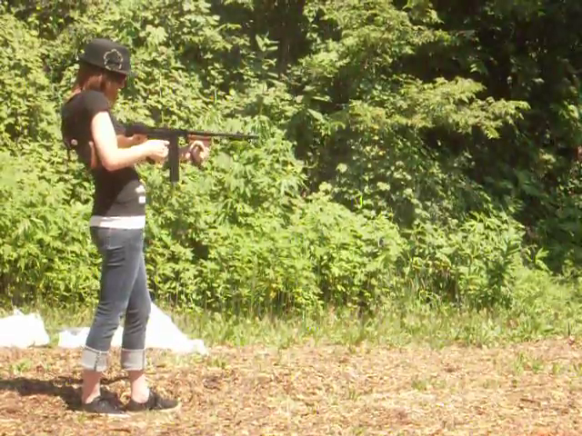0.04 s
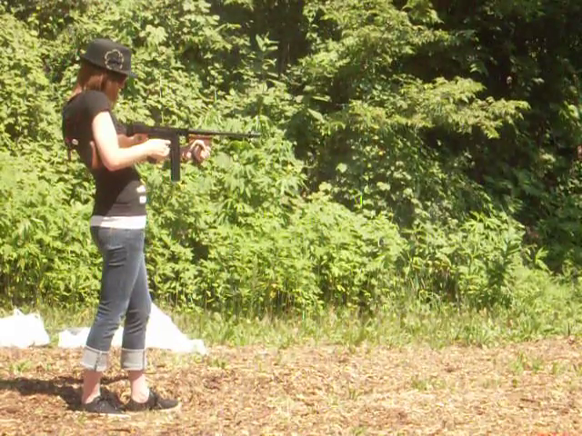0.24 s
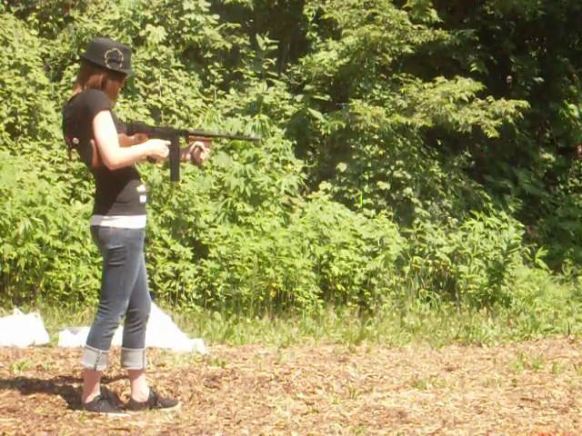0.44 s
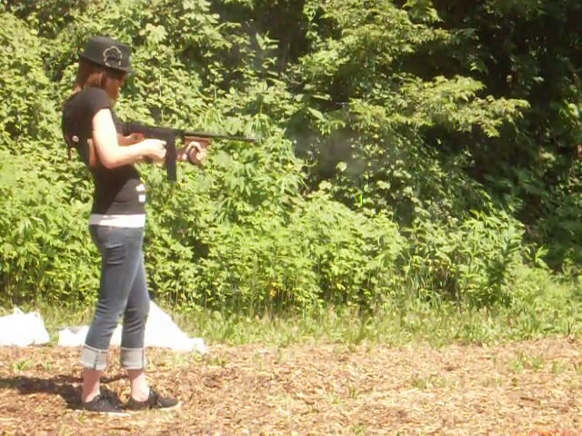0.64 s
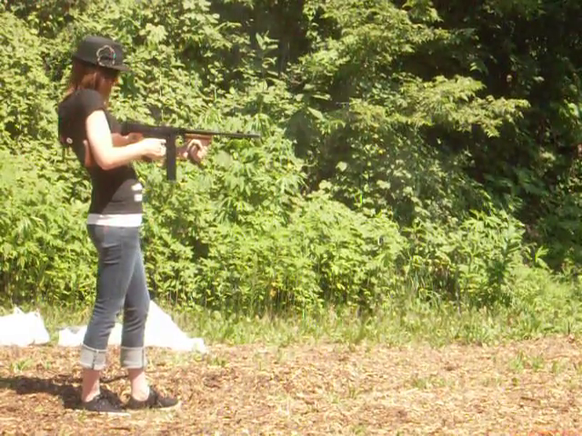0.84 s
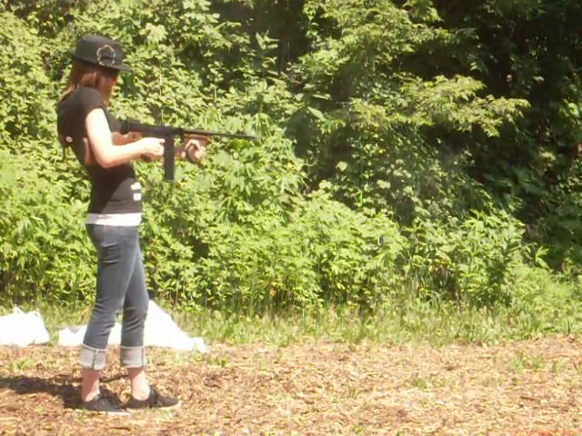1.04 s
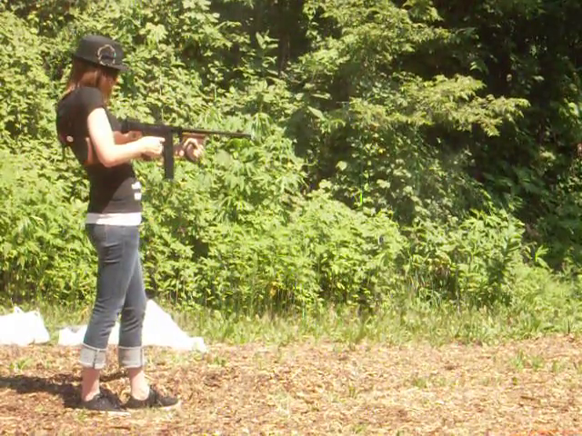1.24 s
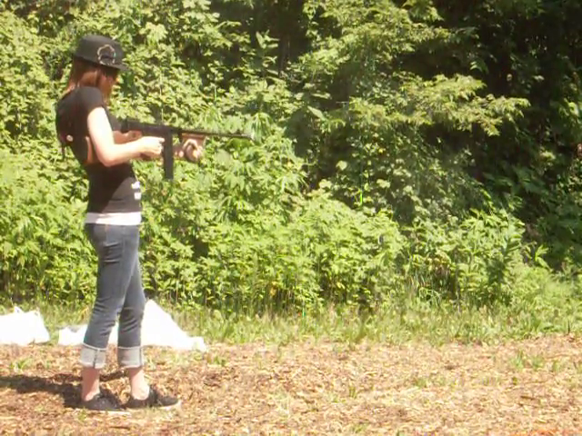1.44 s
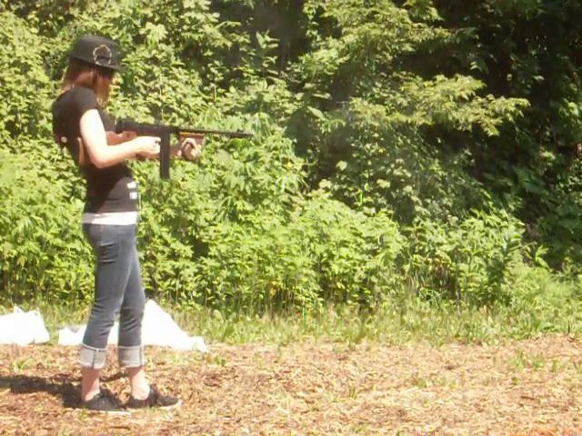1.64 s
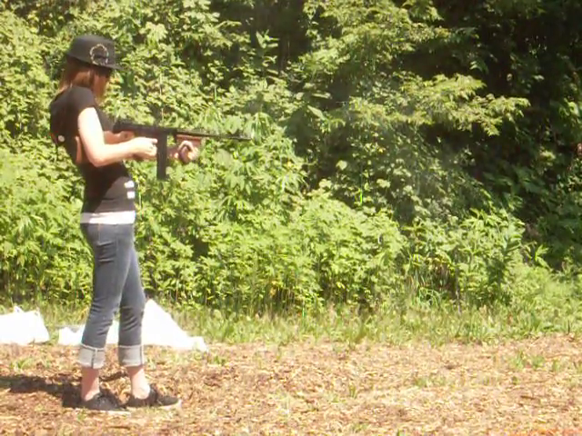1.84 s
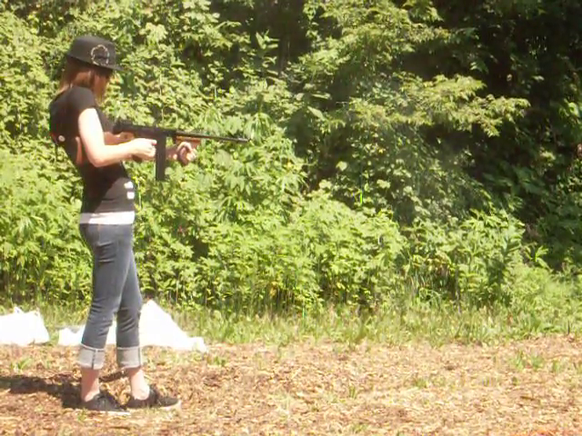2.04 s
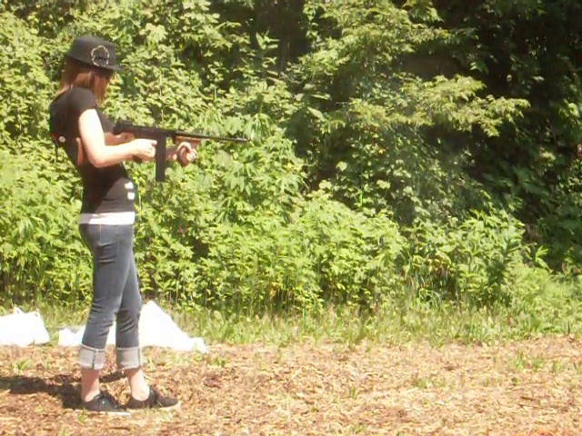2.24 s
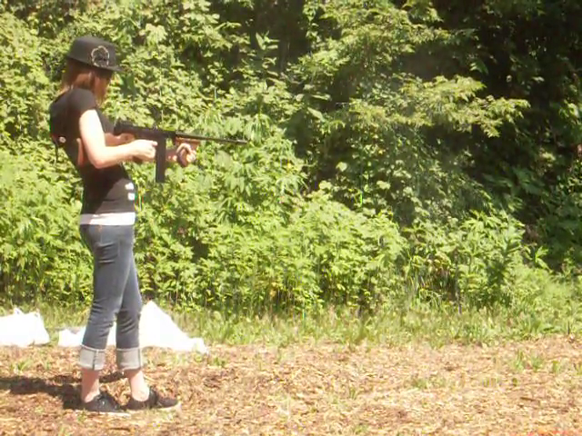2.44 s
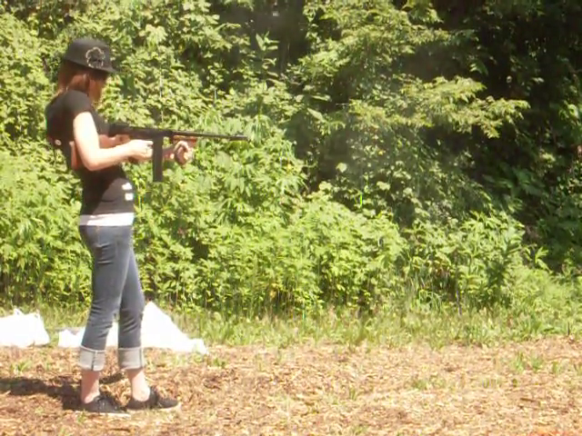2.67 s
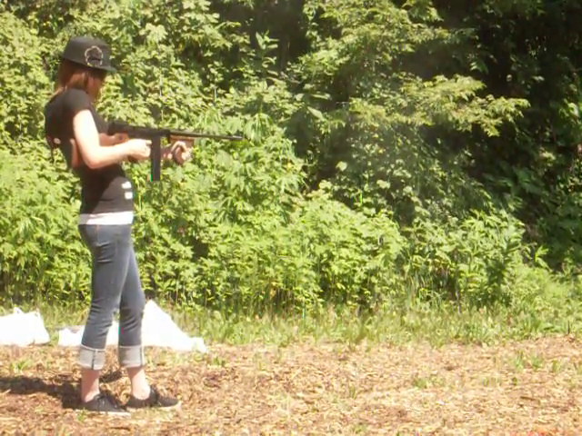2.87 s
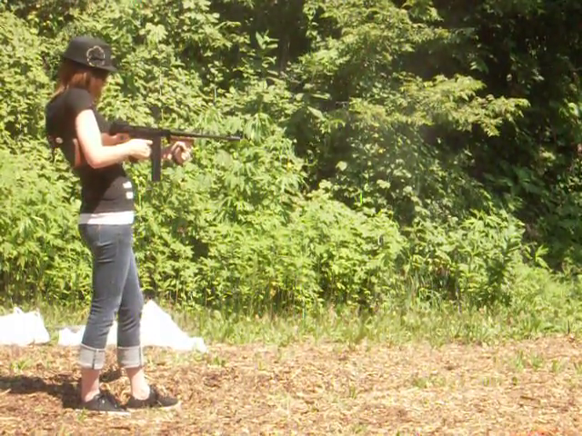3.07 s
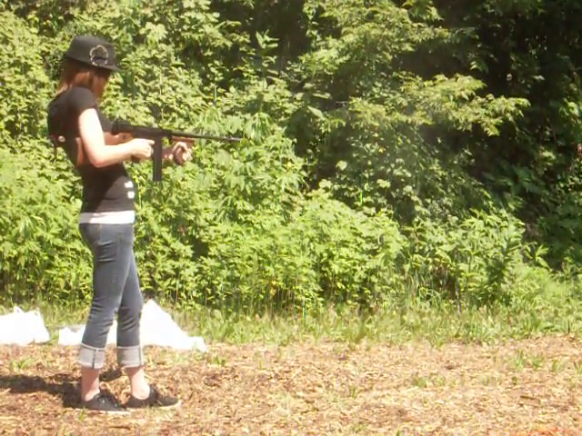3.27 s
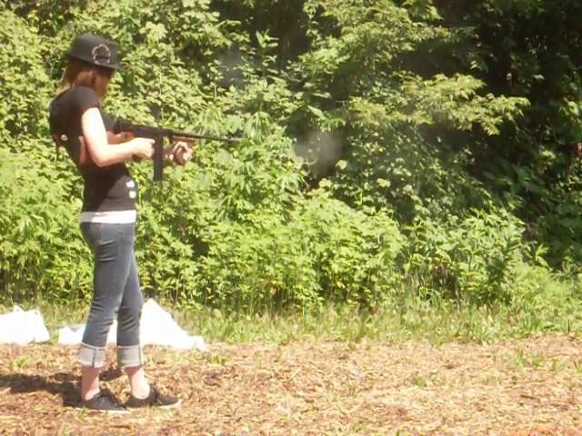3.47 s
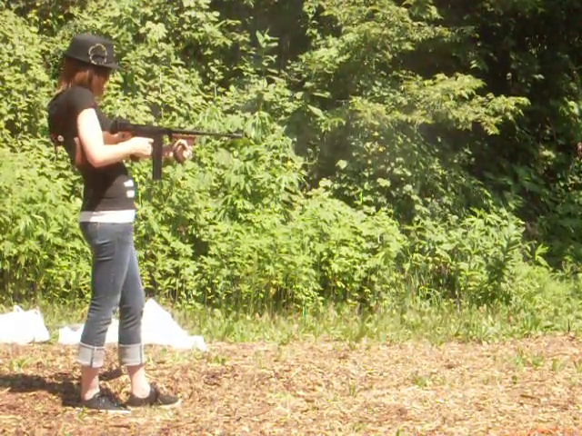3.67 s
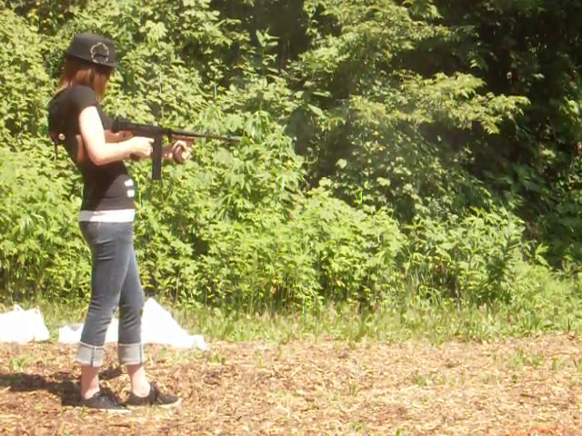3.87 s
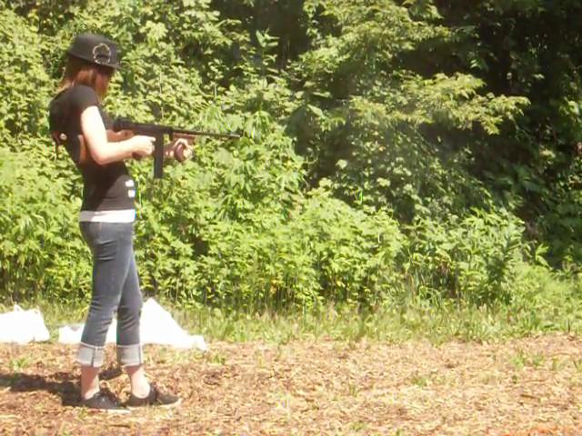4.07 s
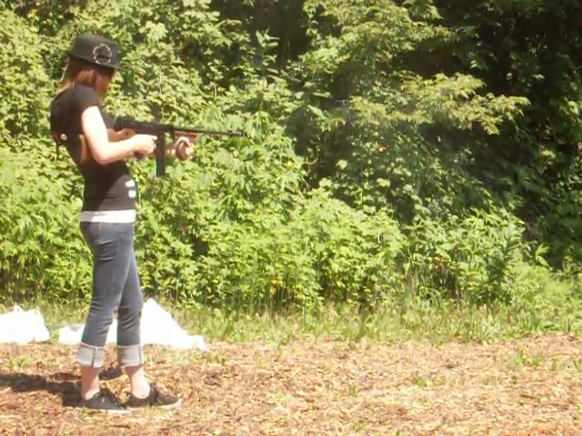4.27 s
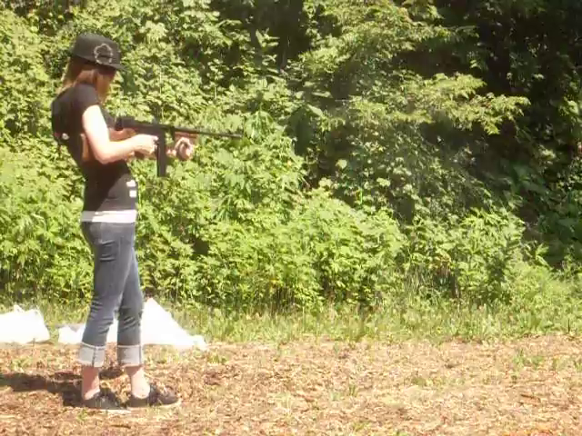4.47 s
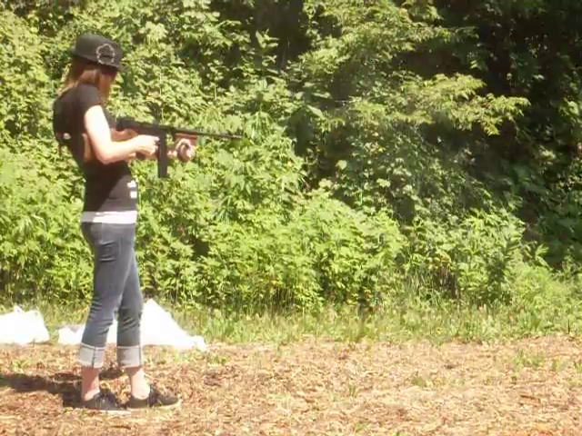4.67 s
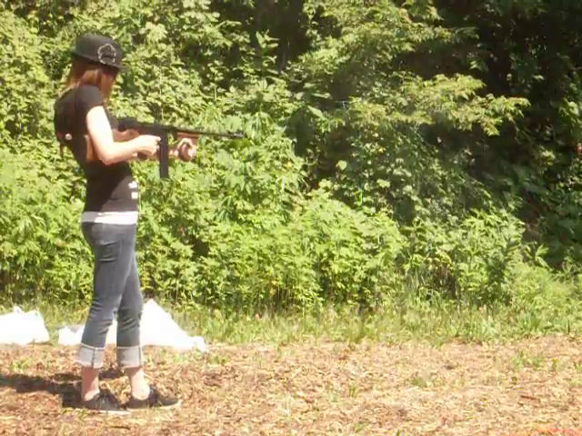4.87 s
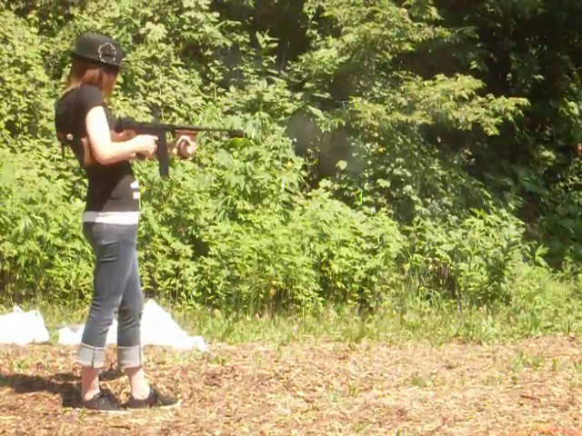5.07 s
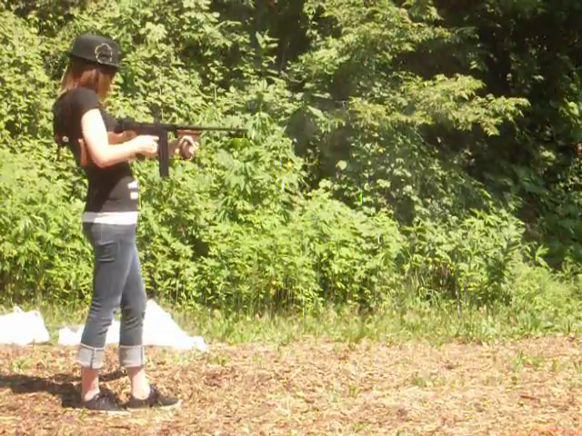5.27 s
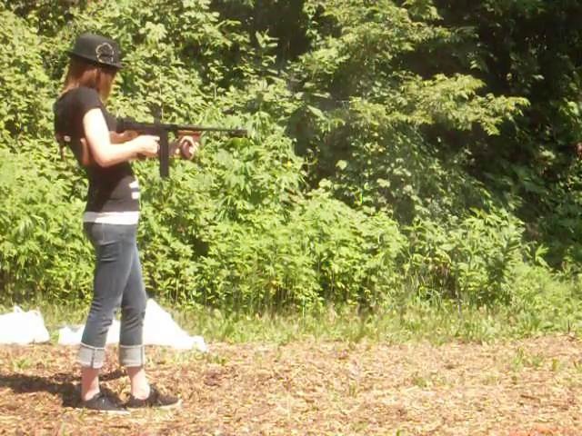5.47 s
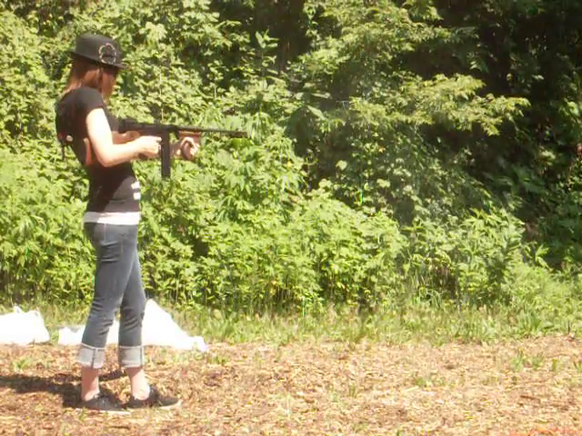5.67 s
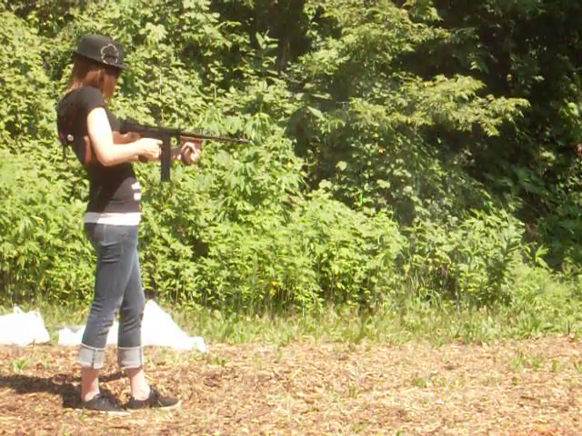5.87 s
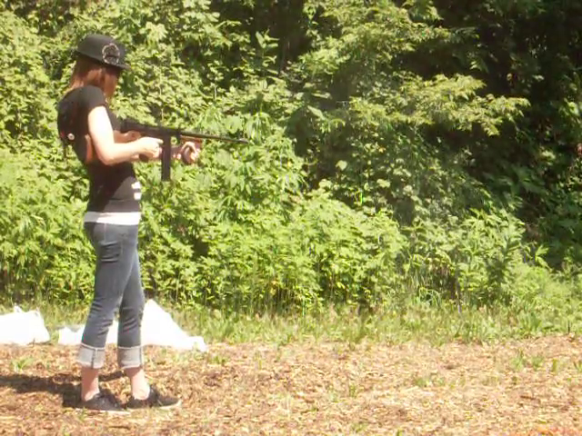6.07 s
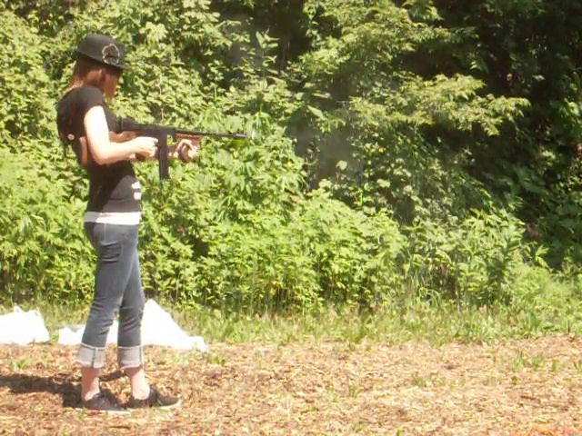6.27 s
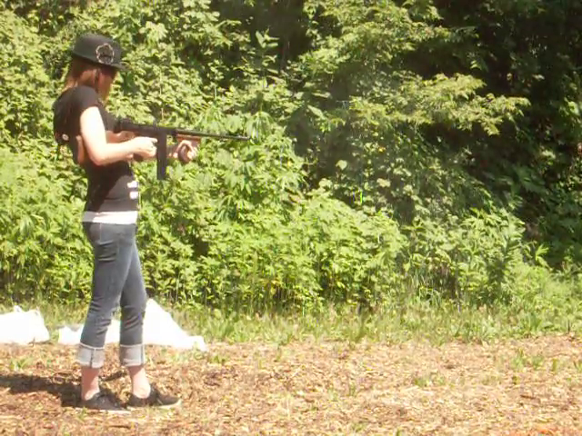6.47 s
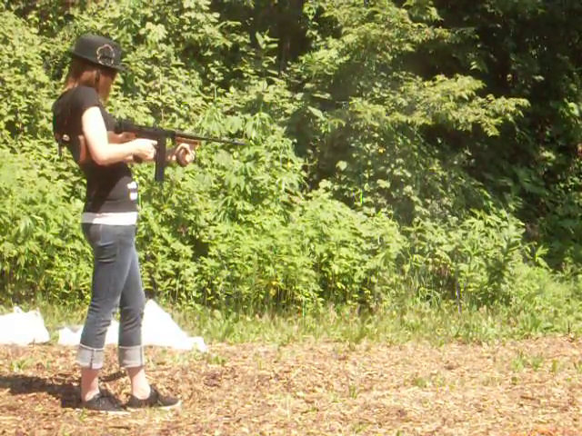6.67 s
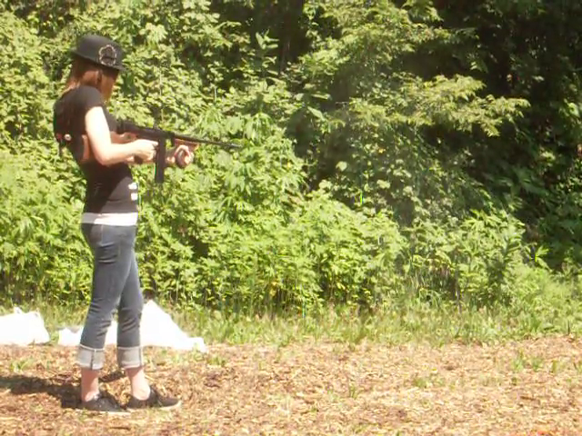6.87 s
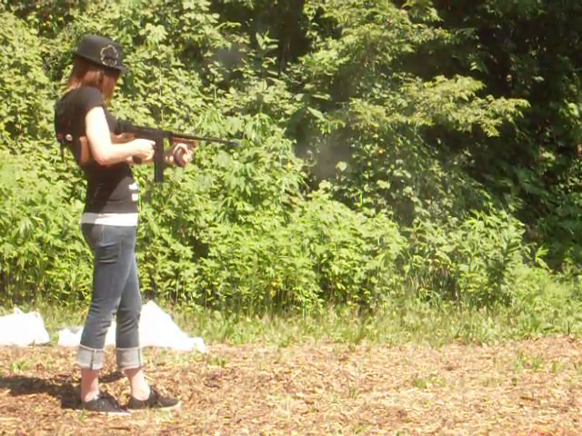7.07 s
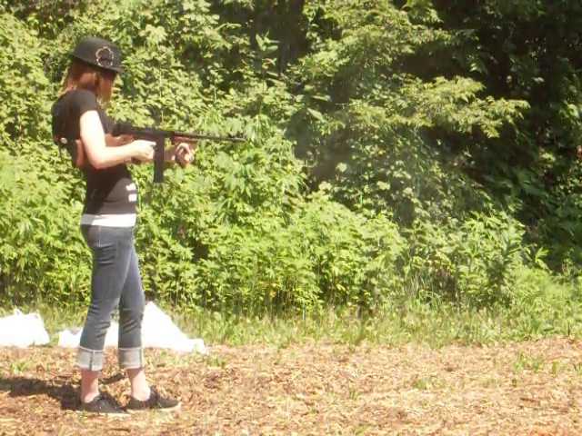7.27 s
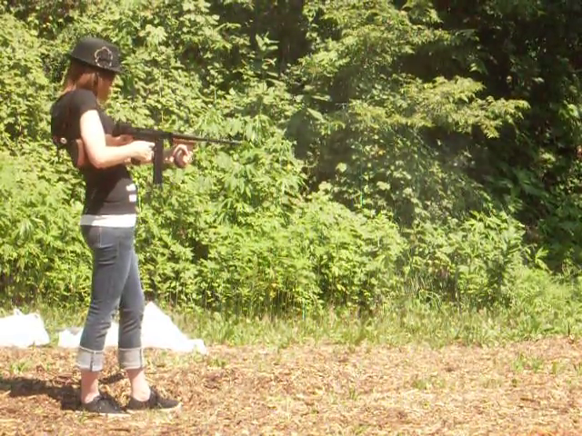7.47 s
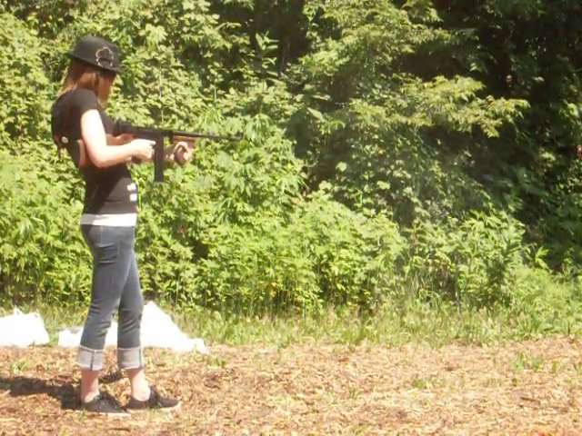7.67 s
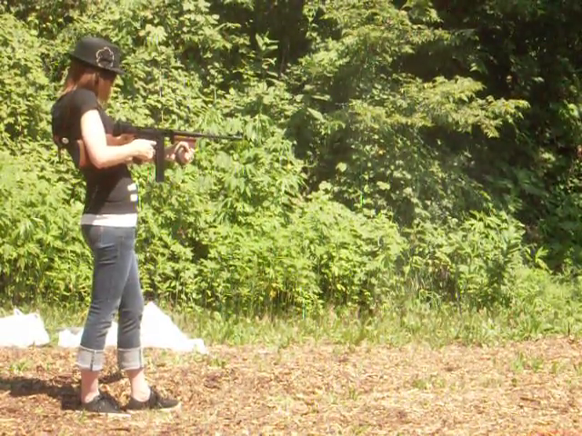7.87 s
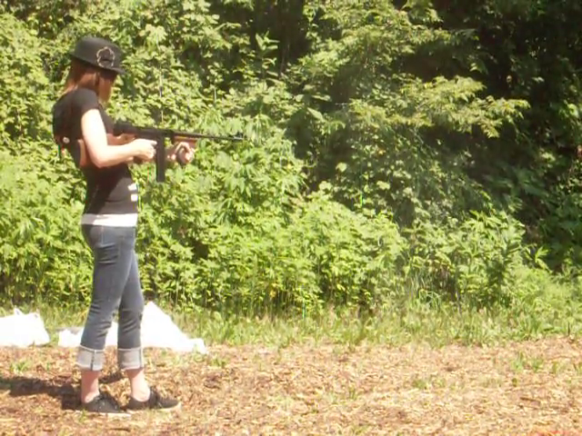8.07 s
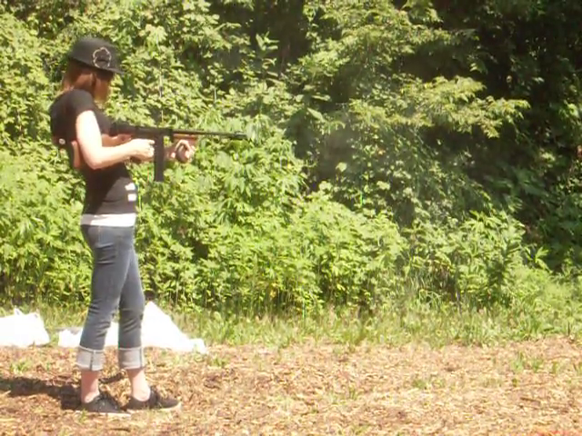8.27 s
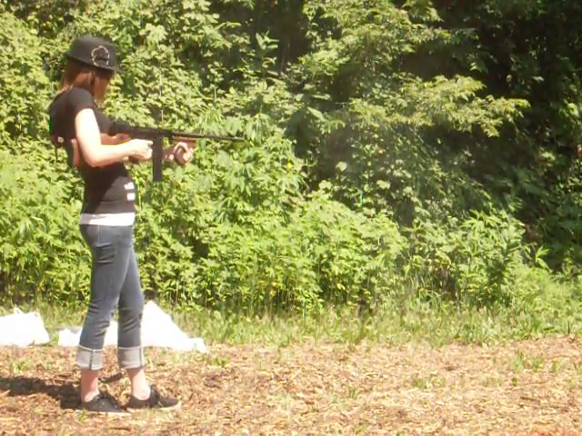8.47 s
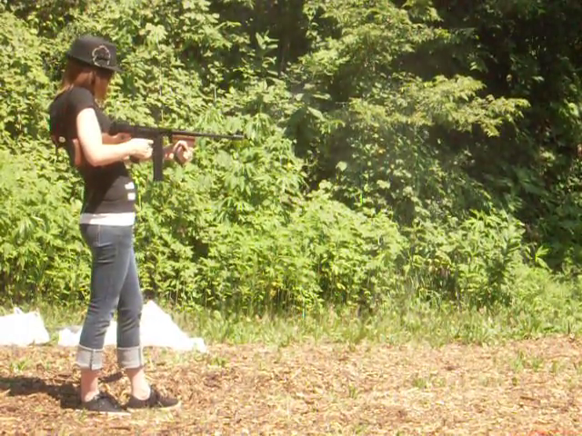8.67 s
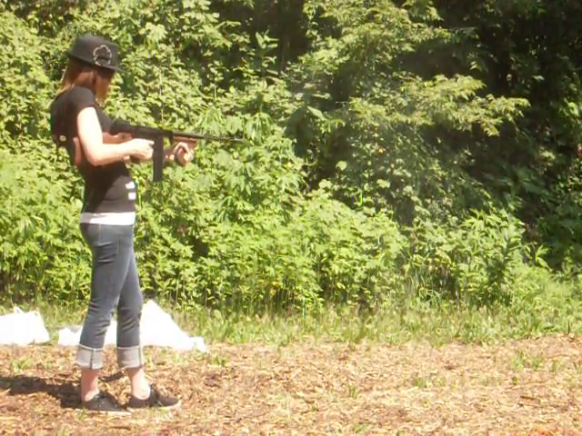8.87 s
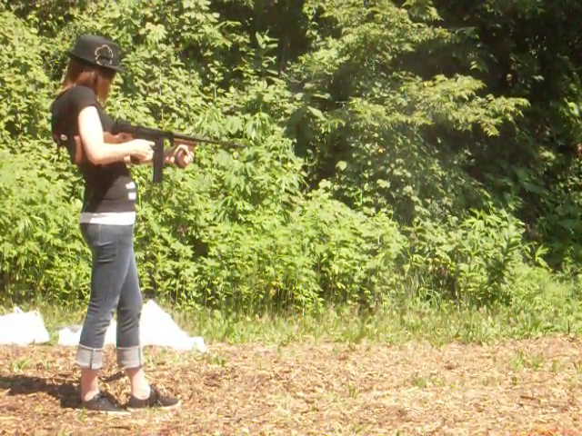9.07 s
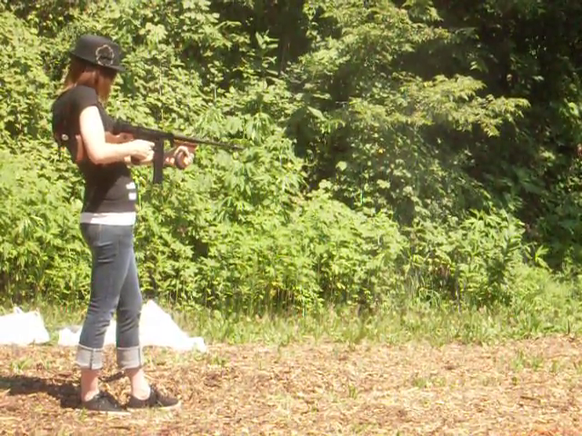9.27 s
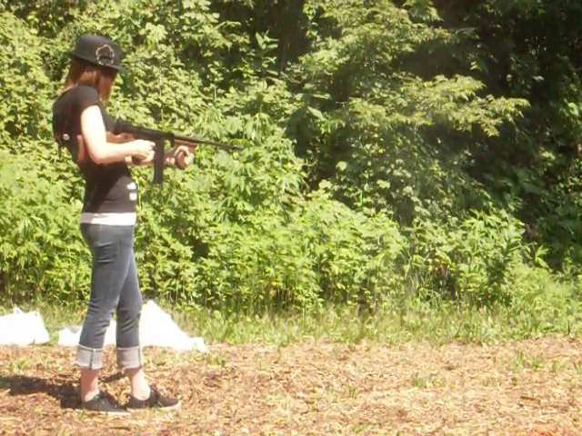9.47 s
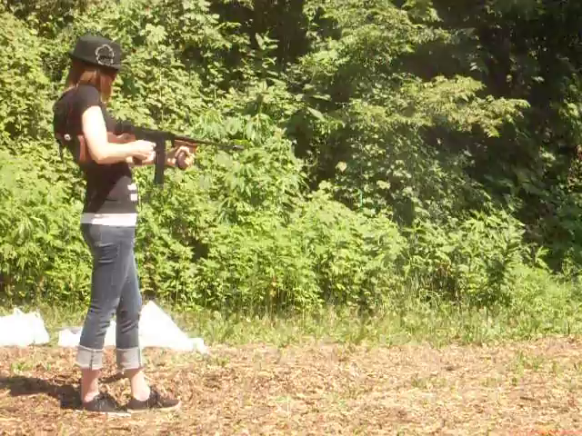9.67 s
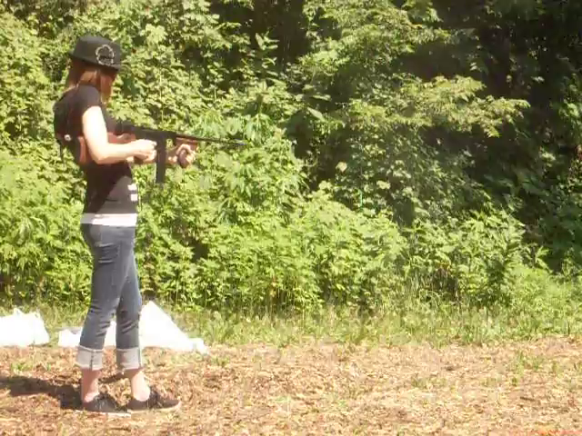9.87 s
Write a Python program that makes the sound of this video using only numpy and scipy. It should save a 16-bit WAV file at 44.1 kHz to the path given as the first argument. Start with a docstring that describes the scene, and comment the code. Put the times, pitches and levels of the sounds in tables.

```python
"""Eight overloaded single shots from a submachine gun, outdoors before dense woods.
Each is a bolt slam and a blast (pressure pulses ringing resonances, plus noise cracks), single echoes,
a backstop slap, and filtered noise for the foliage wash and far tail. Four bullet impacts follow.
Softer: noise-burst clicks, a ringing spent case, gliding sine chirps, electronic whine and air hiss.
The input ducks, saturates and band-limits the sum."""
import sys
import numpy as np
from scipy import signal
from scipy.fft import rfft, irfft, next_fast_len
from scipy.io import wavfile

SR = 44100
rng = np.random.default_rng(int(sys.argv[2]) if len(sys.argv) > 2 else 0)


def store_pcm(level_fs):
    """Save levels as 16-bit WAV."""
    pcm = np.round(np.clip(level_fs, -1, 1) * 32767).astype(np.int16)
    wavfile.write(sys.argv[1], SR, np.atleast_2d(pcm).T)


N = 437022
TIME_S = np.arange(N) / SR
SHOT_TIME_S = np.arange(int(1.5 * SR)) / SR

# Shots. Each row: start in seconds, strength in dB.
SHOTS = [(.675, -.1), (1.55, .5), (2.5484, 0), (3.5202, -.4), (5.0934, 0), (6.2917, .1), (7.1342, .2),
         (8.1483, .4)]
# Bolt slam and muzzle blast. Each: pulse in dB, pulse length in seconds, crack in dB, crack t60 in seconds.
BOLT_SLAM = (-13, .00025, -2.5, .021)
MUZZLE_BLAST = (8.3, .00055, -5.5, .018)
# Resonances the blast excites. Each row: pitch in Hz, width in Hz, gain in dB.
BLAST_MODES = [(162, 83, -4), (442.2, 30, 1), (650, 180, 9.5), (825, 130, 14), (1473, 120, 10.5)]
# Colour of every crack. Each row: frequency in Hz, gain in dB.
CRACK_COLOUR = [(100, -17.5), (500, 0), (1500, 1.5), (3000, 8), (5000, 2), (7000, 3.5), (10500, -2),
                (14000, -14)]
# Single echoes, near ground and bushes to far trunks. Each row: delay in seconds, pulse in dB.
ECHOES = [(.0108, -11), (.016, -12), (.0238, -13), (.067, -17), (.0735, -9.5), (.1335, -25), (.1656, -21.5),
          (.301, -29)]
# Backstop slap. In order: delay in seconds, pulse in dB, pulse length in seconds, crack in dB,
# crack t60 in seconds.
BACKSTOP = (.0566, 15, .00014, 0, .008)
# Resonances of slap and impacts. Each row: pitch in Hz, width in Hz, gain in dB.
SLAP_MODES = [(187.8, 90, 3.6), (836, 90, 12.3), (1076, 150, 13), (1355, 180, 13.3), (2180, 230, 8.3),
              (3050, 350, 2.6), (4000, 900, 5)]
# Scatter from the woods, before WASH_DB, TAIL_DB and shot strength. Each row: frequency in Hz,
# foliage in dB per Hz, foliage t60 in seconds, far in dB per Hz, far t60 in seconds.
WOODS = [(35, -67.5, 0.1, -89, 1.8), (138, -70.5, 0.31, -70, 1.2), (287, -50, 0.15, -66.5, 1.3),
         (400, -58, 0.39, -65.5, 1.3), (560, -53, .35, -58.5, 1.34), (920, -48, 0.26, -57, 1.51),
         (1065, -55, 0.46, -60, 1.376), (1390, -52.5, .38, -59.5, 1.516), (1950, -54.5, .42, -63, 1.364),
         (4000, -53.5, 0.31, -60, 0.99), (4810, -51.5, .42, -60.5, 1.05), (6600, -61.5, 0.3, -58.5, 0.67),
         (10300, -63, 0.3, -65.5, 0.63), (13200, -72, .33, -76, 0.61)]
# Bullets striking downrange. Each row: start in seconds, pulse in dB, pulse length in seconds.
IMPACTS = [(1.6223, 0, .00028), (3.5893, -.5, .00006), (5.168, -1, .000045), (7.203, .5, .00005)]
# Trigger and sear clicks. Each row: start in seconds, level before filtering in dB, pitch in Hz,
# t60 in seconds.
CLICKS = [(2.452, -46.5, 4800, .03), (4.189, -60, 6000, .03), (6.006, -44, 3800, .035),
          (6.168, -29, 3940, .0084), (7.097, -47, 4800, .018), (7.999, -40.5, 9000, .019),
          (8.001, -44, 4180, .025), (9.041, -43, 4100, .025), (9.284, -43, 4300, .017)]
# Modes of the spent case. Each row: pitch in Hz, peak in dB, t60 in seconds.
CASE_MODES = [(4280, -67, 0.13), (10850, -57, .16), (11160, -55, .2)]
# Bird chirps. Each row: start in seconds, middle pitch in Hz, glide in octaves, peak in dB.
CHIRPS = [(1.452, 3680, .3, -64), (7.812, 3950, .3, -68), (7.958, 3580, .2, -63.5),
          (8.094, 3650, .25, -62.5), (9.485, 3780, .1, -73), (9.524, 3170, .2, -73),
          (9.807, 3650, -.8, -69), (9.876, 3300, .4, -64.5)]
# Steady whine. Each row: pitch in Hz, level in dB rms.
STEADY_WHINE = [(2543.5, -89), (5087, -74.5), (7643.5, -67.5), (8812, -87)]
# Wandering whine. Each row: time in seconds, pitch in Hz before jitter.
WANDERING_PITCH = [(0, 1879), (0.53, 1820), (0.58, 1367), (0.63, 1470), (1.42, 1755), (4.6, 1696),
                   (5.03, 1685), (5.96, 1766), (6.13, 2143), (6.24, 1938), (9.2, 1906), (9.52, 2040),
                   (9.65, 1868), (9.85, 1960)]
# Wandering whine levels. In order: tone, lower sideband, upper sideband, all in dB rms.
WANDERING_DB = (-75.4, -93, -86.5)
# Still air and hiss. Each row: frequency in Hz, level in dB per Hz.
AIR = [(25, -112), (100, -108), (300, -105), (800, -105), (1500, -111), (3000, -115), (6000, -116),
       (10000, -117), (13000, -132)]

# direct sound with single echoes, foliage wash, far tail; shot strength adds to each
REPORT_DB, WASH_DB, TAIL_DB = 2.4, 1.5, -1.8
BOLT_RUN_S, IGNITION_S = .015, .0026
ECHO_PULSE_S, ECHO_CRACK_T60_S = .00026, .018
# echo crack relative to its pulse
NEAR_ECHO_S, NEAR_CRACK_DB, DULLING_DB_PER_DOUBLING = .01, 4.5, 6.3
# impact crack: relative to its pulse; t60 in pulse lengths
IMPACT_CRACK_DB, IMPACT_CRACK_LENGTHS = -11.5, 68
CASE_S, CHIRP_S = 9.284, .042


def gunfire(clump_db=2.3, clumps_per_s=170, alike=.5):
    """All shots meet the same trees, so their echoes share much of their pattern."""
    out = np.zeros(N)
    shape = (2, len(SHOT_TIME_S))
    trees = rng.standard_normal(shape)
    bands = woods_bands()
    # early echoes come in clumps, later ones merge
    clumps = from_db(clump_db * drift(SHOT_TIME_S, clumps_per_s) / (1 + SHOT_TIME_S / .37))
    for start_s, strength_db in SHOTS:
        add(out, start_s - BOLT_RUN_S, bolt_run())
        add(out, start_s, from_db(strength_db + REPORT_DB) * report())
        add(out, start_s + BACKSTOP[0], backstop_slap())
        fresh = rng.standard_normal(shape)
        scatter = clumps * (np.sqrt(alike) * trees + np.sqrt(1 - alike) * fresh)
        add(out, start_s, from_db(strength_db) * woods(bands, scatter))
    return out


def bolt_run(level_db=-51, hz=2100, width_hz=9000):
    """The bolt rasps forward before firing: swelling noise through a broad resonance."""
    run = np.linspace(.5, 1, int(BOLT_RUN_S * SR))
    return from_db(level_db) * run * resonate(rng.standard_normal(len(run)), hz, width_hz)


def report():
    """Bolt slam, muzzle blast and single echoes of one shot."""
    out = np.zeros(len(SHOT_TIME_S))
    add(out, 0, bang(BLAST_MODES, *BOLT_SLAM))
    add(out, IGNITION_S, bang(BLAST_MODES, *MUZZLE_BLAST))
    for delay_s, pulse_db in ECHOES:
        add(out, delay_s, echo(delay_s, pulse_db))
    return out


def bang(modes, pulse_db, length_s, crack_db, crack_t60_s):
    """A pressure jump with its suction phase rings the resonances; a short noisy crack rides on it."""
    t = SHOT_TIME_S[:SR // 10]
    phase = t / (length_s * rng.uniform(.92, 1.08))
    pulse = from_db(pulse_db) * (1 - phase) * np.exp(-phase)
    boom = sum(from_db(db) * resonate(pulse, hz, width_hz) for hz, width_hz, db in modes)
    noise = coloured(rng.standard_normal(len(t)), CRACK_COLOUR)
    crack = from_db(crack_db) * noise * fade(t, crack_t60_s)
    return crack - pulse - boom


def echo(delay_s, pulse_db):
    """A single reflection of the blast: the longer its way, the less crack is left."""
    dulling_db = DULLING_DB_PER_DOUBLING * np.log2(delay_s / NEAR_ECHO_S)
    crack_db = pulse_db + NEAR_CRACK_DB - dulling_db
    return bang(BLAST_MODES, pulse_db, ECHO_PULSE_S, crack_db, ECHO_CRACK_T60_S)


def backstop_slap():
    """The backstop returns a hard, short pulse with its own resonances."""
    return bang(SLAP_MODES, *BACKSTOP[1:])


def woods(bands, scatter):
    """The woods answer one shot: scattered noise, filtered and enveloped band by band."""
    out = np.zeros(len(SHOT_TIME_S))
    for k, (band, level) in enumerate(bands):
        # neighbouring bands use different noise
        out += signal.sosfilt(band, scatter[k % 2]) * level
    return np.sqrt(SR / 2) * out


def woods_bands():
    """Filter and level over time per third octave: near foliage wash plus far tail, summed in power."""
    bands = []
    edges_hz = 25 * 2 ** (np.arange(28) / 3)
    for low_hz, high_hz in zip(edges_hz, edges_hz[1:]):
        near_db, near_t60_s, far_db, far_t60_s = at_hz(WOODS, np.sqrt(low_hz * high_hz))
        tail = far_tail(low_hz, far_db, far_t60_s)
        wash = foliage_wash(near_db, near_t60_s)
        band = signal.butter(2, [low_hz, high_hz], "band", fs=SR, output="sos")
        bands.append((band, np.hypot(wash, tail)))
    return bands


def foliage_wash(db, t60_s, rise_s=.016, blast_hold_s=.035, slap_db=-2.4, slap_hold_s=.006):
    """Leaves answer blast and slap: each wash holds while the sound crosses them, then decays."""
    def answer(age_s, hold_s):
        """Rises, holds, then fades."""
        return swell(age_s, rise_s) / np.hypot(1, fade(hold_s - age_s, t60_s))

    to_blast = answer(SHOT_TIME_S, blast_hold_s)
    to_slap = answer(SHOT_TIME_S - BACKSTOP[0], slap_hold_s)
    return from_db(WASH_DB + db) * np.hypot(to_blast, from_db(slap_db) * to_slap)


def far_tail(low_hz, db, t60_s, rise_s=.03, lump_db=2.0, lumps_per_s=45):
    """Far trunks return the lows in separate lumps; leaves scatter the treble evenly."""
    lumps_db = lump_db * drift(SHOT_TIME_S, lumps_per_s) / np.hypot(1, low_hz / 2500)
    return from_db(TAIL_DB + db + lumps_db) * swell(SHOT_TIME_S, rise_s) * fade(SHOT_TIME_S, t60_s)


def bullet_impacts():
    """Strikes downrange: short pulses that ring the slap resonances."""
    out = np.zeros(N)
    for start_s, db, length_s in IMPACTS:
        crack_t60_s = IMPACT_CRACK_LENGTHS * length_s
        add(out, start_s, bang(SLAP_MODES, db, length_s, db + IMPACT_CRACK_DB, crack_t60_s))
    return out


def action_clicks(width_share=.55):
    """Dry trigger and sear clicks: decaying noise through two equal resonances."""
    out = np.zeros(N)
    for start_s, db, hz, t60_s in CLICKS:
        touch = from_db(db) * rng.standard_normal(len(SHOT_TIME_S)) * fade(SHOT_TIME_S, t60_s)
        once = resonate(touch, hz, width_share * hz)
        add(out, start_s, resonate(once, hz, width_share * hz))
    return out


def case_ring():
    """A nudged brass case rings thinly: decaying sine modes."""
    out = np.zeros(N)
    for hz, db, t60_s in CASE_MODES:
        ring = np.sin(2 * np.pi * hz * SHOT_TIME_S) * fade(SHOT_TIME_S, t60_s)
        add(out, CASE_S, from_db(db) * ring)
    return out


def birds(flutter=.03, flutters_per_s=200):
    """Short whistles: gliding sines with fluttering pitch."""
    out = np.zeros(N)
    quiver = 1 + flutter * drift(TIME_S, flutters_per_s)
    progress = np.linspace(-.5, .5, int(CHIRP_S * SR))
    for start_s, middle_hz, octaves, db in CHIRPS:
        local_quiver = np.roll(quiver, -int(start_s * SR))[:len(progress)]
        hz = middle_hz * 2 ** (octaves * progress) * local_quiver
        whistle = np.sin(2 * np.pi * np.cumsum(hz) / SR)
        add(out, start_s, from_db(db) * np.hanning(len(hz)) * whistle)
    return out


def electronic_whine():
    """Steady sine tones, and a group that wanders and jitters together."""
    steady = sum(from_db(db) * np.sin(2 * np.pi * hz * TIME_S) for hz, db in STEADY_WHINE)
    jitter = .022 * drift(TIME_S, 50) + .042 * drift(TIME_S, 450)
    pitch_hz = np.interp(TIME_S, *np.transpose(WANDERING_PITCH))
    cycles = np.cumsum(pitch_hz * (1 + jitter)) / SR
    # sidebands lie around the strongest steady tone
    carrier = STEADY_WHINE[2][0] * TIME_S
    wandering = np.zeros(N)
    for db, turns in zip(WANDERING_DB, (cycles, carrier - cycles, carrier + cycles)):
        wandering += from_db(db) * np.sin(2 * np.pi * turns)
    return np.sqrt(2) * (steady + wandering)  # rms to peak


def still_air():
    """Steady coloured noise."""
    return coloured(rng.standard_normal(N), AIR) * np.sqrt(SR / 2)


def from_db(db):
    """dB to amplitude."""
    return 10 ** (np.asarray(db) / 20)


def fade(t_s, t60_s):
    """Falls by 60 dB in t60_s."""
    return np.exp(-np.log(1000) * t_s / t60_s)


def swell(t_s, rise_s):
    """Rises smoothly from 0 to 1, starting at time 0."""
    return 1 - np.exp(-(np.maximum(t_s, 0) / rise_s) ** 2)


def drift(t_s, knots_per_s):
    """Random values joined by straight lines, spread near 1."""
    knots = rng.standard_normal(8192)
    return np.interp(t_s * knots_per_s, np.arange(len(knots)), knots)


def add(track, start_s, sound):
    """Mixes a sound in at a time."""
    start = max(int(round(start_s * SR)), 0)
    track[start:start + len(sound)] += sound[:len(track) - start]


def at_hz(table, hz):
    """Every column of a table, read on a log-frequency axis."""
    freqs_hz, *columns = np.transpose(table)
    return [np.interp(np.log(hz + 1e-9), np.log(freqs_hz), column) for column in columns]


def coloured(noise, spectrum):
    """Shapes noise with a table of dB over Hz."""
    size = next_fast_len(len(noise))
    level_db, = at_hz(spectrum, np.fft.rfftfreq(size, 1 / SR))
    return irfft(rfft(noise, size) * from_db(level_db), size)[:len(noise)]


def resonate(x, hz, width_hz):
    """A two-pole resonance with gain near 1 at its top."""
    r = np.exp(-np.pi * width_hz / SR)
    zeros = np.array([1, 0, -1]) * (1 - r * r) / 2
    poles = [1, -2 * r * np.cos(2 * np.pi * hz / SR), r * r]
    return signal.lfilter(zeros, poles, x)


def limiter(x, threshold_db=1, release_db_per_s=1700, smoothing_s=.004, slope=.75):
    """Gain ducks by a share of the held overshoot, smoothed over milliseconds."""
    over_db = np.maximum(20 * np.log10(np.abs(x) + 1e-9) - threshold_db, 0)
    # peak hold that falls at the release rate
    ramp_db = release_db_per_s * TIME_S
    held_db = np.maximum.accumulate(over_db + ramp_db, axis=-1) - ramp_db
    r = np.exp(-1 / (smoothing_s * SR))
    return x * from_db(-slope * signal.lfilter([1 - r], [1, -r], held_db))


def scene():
    """Sum of all sources, one channel."""
    shooting = gunfire() + bullet_impacts()
    handling = action_clicks() + case_ring()
    return (shooting + handling + birds() + electronic_whine() + still_air())[None]


def record(dry, input_top=.58, output_top=.72, band_hz=10800, low_cut_hz=22, cutoff_hz=16000):
    """The input ducks and saturates, a narrow band rounds it off, the overshoots clip once more."""
    ducked = limiter(dry)
    overloaded = ducked / (1 + (ducked / input_top) ** 6) ** (1 / 6)
    narrow = signal.sosfilt(signal.butter(14, band_hz, fs=SR, output="sos"), overloaded)
    thinned = signal.sosfilt(signal.butter(1, low_cut_hz, "high", fs=SR, output="sos"), narrow)
    clipped = np.clip(thinned, -output_top, output_top)
    return signal.sosfilt(signal.ellip(10, .1, 80, cutoff_hz, fs=SR, output="sos"), clipped)


dry = scene()
out = record(dry)
store_pcm(out)
```